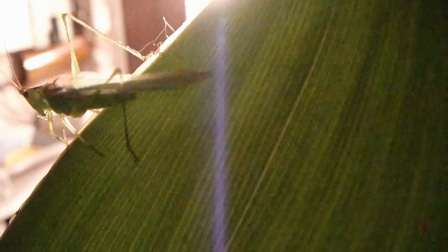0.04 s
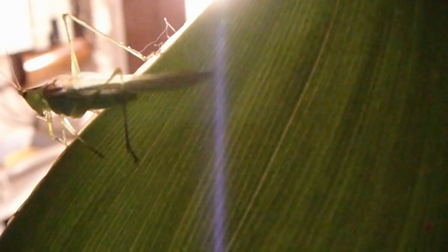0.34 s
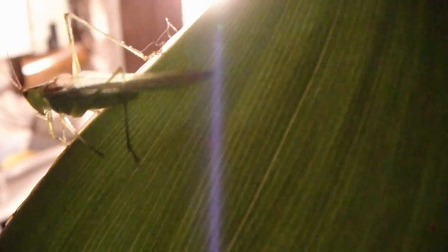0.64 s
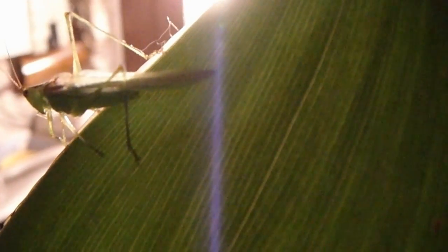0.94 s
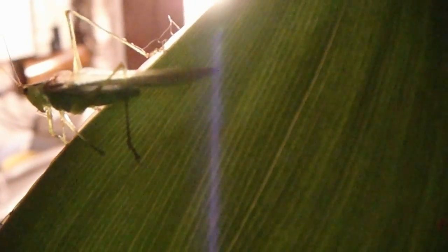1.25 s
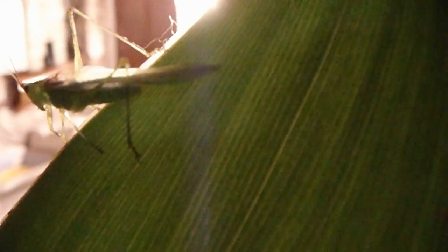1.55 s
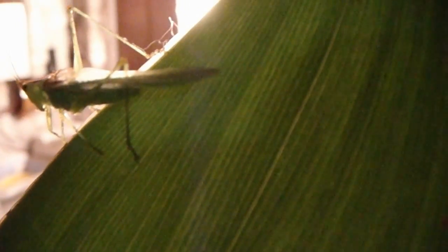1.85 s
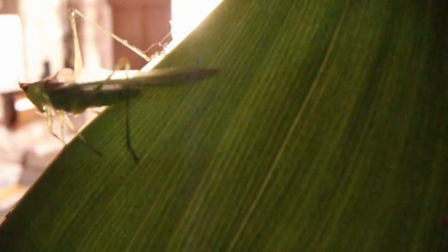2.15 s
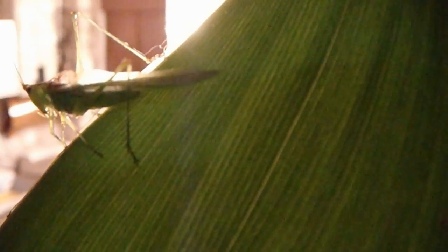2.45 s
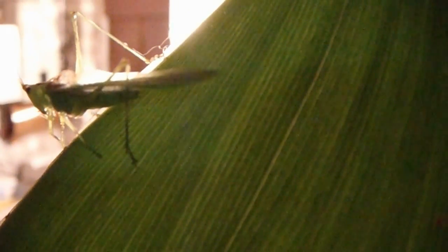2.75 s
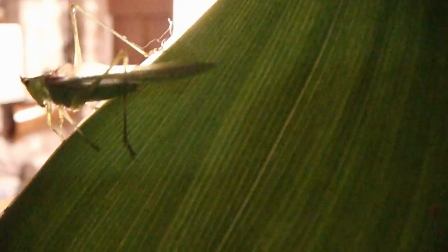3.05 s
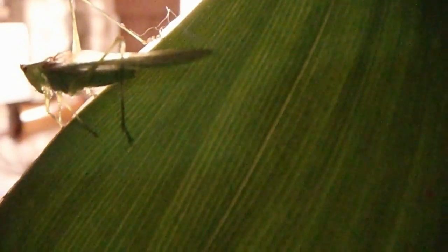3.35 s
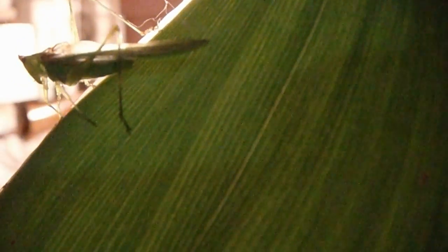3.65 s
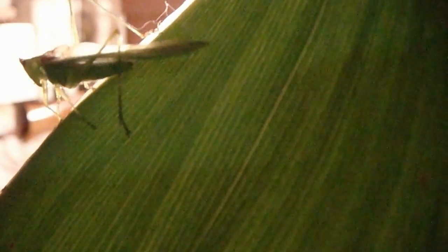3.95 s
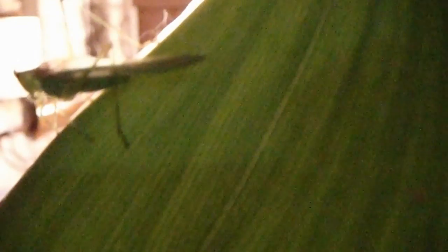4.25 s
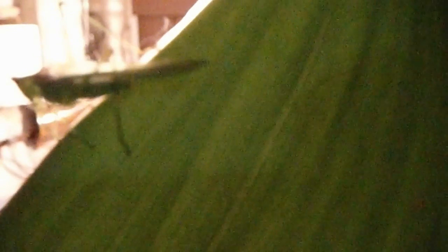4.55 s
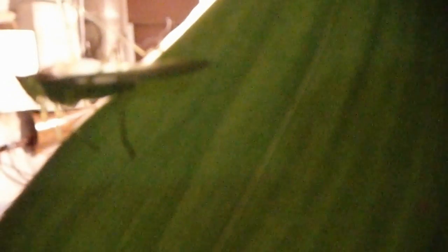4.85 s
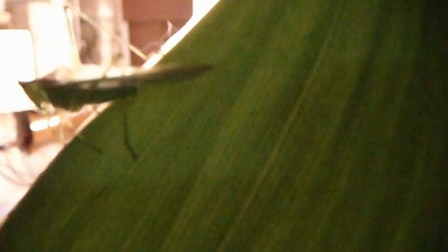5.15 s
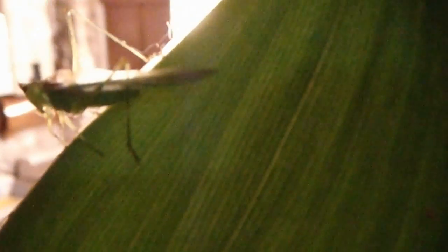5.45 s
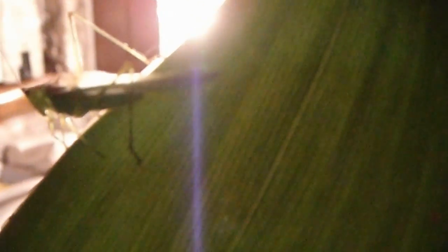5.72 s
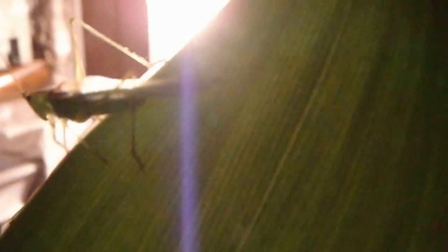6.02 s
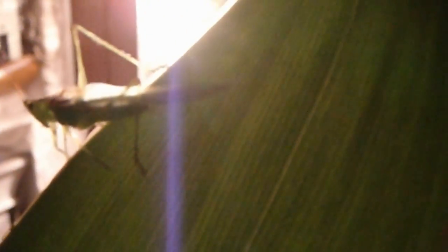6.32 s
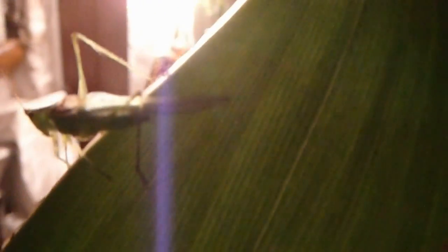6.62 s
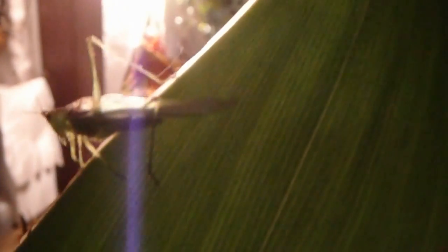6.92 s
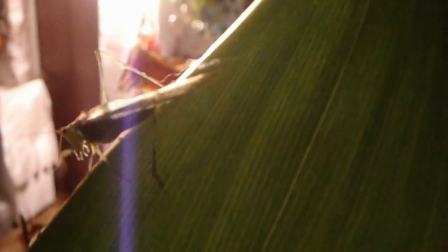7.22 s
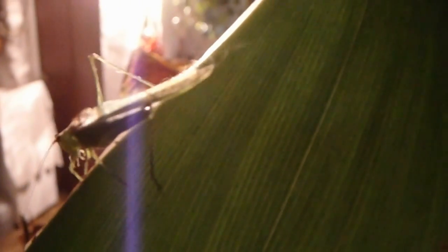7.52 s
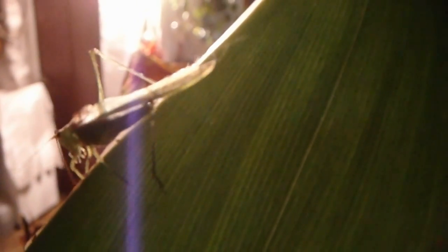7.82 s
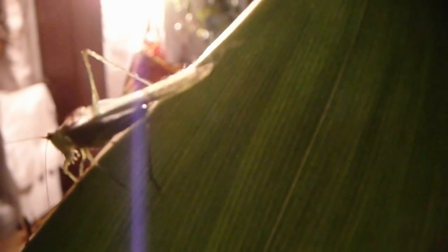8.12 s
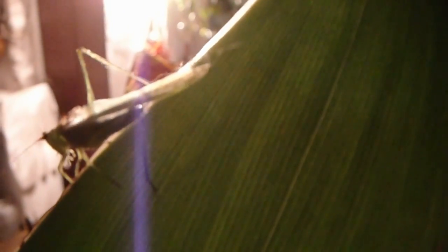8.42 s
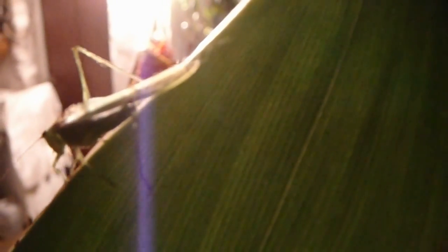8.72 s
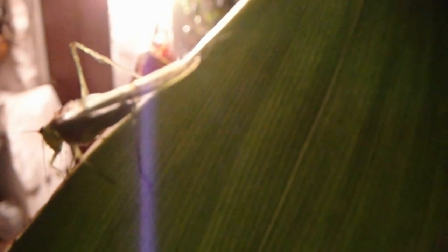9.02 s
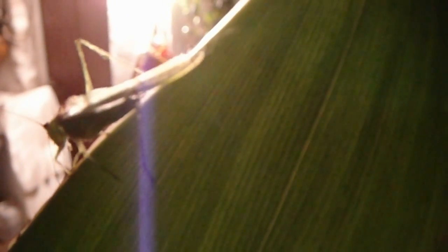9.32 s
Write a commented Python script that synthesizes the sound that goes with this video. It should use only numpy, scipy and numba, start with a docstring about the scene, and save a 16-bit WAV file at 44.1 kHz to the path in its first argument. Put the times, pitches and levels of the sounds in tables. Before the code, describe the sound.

A katydid buzzes close to the microphone outdoors at night: a dry, slightly woody rasp of about forty pulses a second, topped by a thin, very high ring. It is already singing at the start and stops abruptly at 1.7 seconds. It returns from 2.2 to 3.3, briefly around 4, from 4.5 to 7, from 7.5 to 8.4, and in a last blip at 9.4. Restarts come in loud, with tiny snaps and a soft flutter of air, then settle. A low night hush swells in the pauses. A far insect trills very faintly around 3.5 to 4 seconds and again near 8.8. From about 5 to 9 seconds there is faint handling rumble. Around 6.5 the rasp shifts right and spreads, and the buzz turns thinner and more ringing. Toward the end, the soft tyre noise of a distant car draws nearer.

```python
"""Night, a camera close to a katydid on a broad leaf, already in song: forty times a second its wings
open with a thin whistle and close with a rasp of file teeth; the leaf rings and reflects each click.
It pauses abruptly and the gain control lifts the night air, so each new bout starts loud and is pulled
down. A far insect trills around the third bout. From halfway the hand rumbles on the camera and the
katydid turns off axis; toward the end a distant car draws nearer."""
import sys
import numpy as np
from scipy import signal
from scipy.fft import rfft, irfft, next_fast_len
from scipy.io import wavfile
from scipy.ndimage import uniform_filter1d, map_coordinates
from numba import njit

SR = 44100
rng = np.random.default_rng(int(sys.argv[2]) if len(sys.argv) > 2 else 0)


def generate_wav(signal):
    """Clip the signal to [-1, 1] and save it as 16-bit WAV at the path in sys.argv[1]."""
    frames = np.transpose(np.atleast_2d(signal))
    scaled = np.clip(frames, -1, 1) * 32767
    pcm = np.round(scaled).astype(np.int16)
    wavfile.write(sys.argv[1], SR, pcm)


N = 417627
TIME = np.arange(N) / SR


# The insect shifts on its leaf, close to the microphone.
# Each row: time in seconds, rasp level in dB, ring level in dB, turn off axis from 0 to 1.
PERCH = [(0, -48, -43, 0), (3.2, -48, -42.5, 0), (4.85, -51, -43, 0), (5.8, -47, -42, 0.16),
         (6.45, -48.5, -39.5, 1), (6.72, -50.5, -39.5, 1), (7, -55, -38.5, 0.64), (8.4, -53, -39, 1),
         (9.4, -48.5, -40.5, 0.4)]

def katydid(rasp_db=4, ring_db=-2, whistle_db=-10, scuff_db=-20, puff_db=-14.5):
    """The wings rasp, ring, whistle and push air; nearby surfaces scatter the rasp and the ring."""
    phase, openings = wingbeats()
    tooth_db, membrane_db, off_axis = curves(PERCH)
    fresh, surge = bout_starts()
    teeth, membrane = wings_closing(phase)
    whistle, scuff = wings_opening(openings)
    rasp = amp(tooth_db + rasp_db) * (teeth + amp(scuff_db) * scuff)
    rasp = leaf_echo(first_strokes(rasp, fresh, surge) + scraper_catches())
    rasp += amp(-7) * surroundings(rasp)
    # a bout opens with less ring and more whistle
    ring = amp(ring_db - 4 * fresh ** 2) * membrane + amp(whistle_db + 3 * fresh) * whistle
    ring *= amp(membrane_db + 3 * surge)
    ring += amp(-8) * surroundings(ring)
    thump, swirl = wing_draught(phase, openings, fresh, surge, tooth_db + puff_db)
    return microphone_ports(rasp + thump, ring, off_axis, fresh) + swirl


# Bouts of song from the leaf. Each row: start and end in seconds, wingbeats per second, seconds by
# which the middle runs ahead as the wings tire, seconds by which the first half lags and the second
# leads, opening surge from 0 to 1.
SONG_BOUTS = [(-0.029, 1.747, 39.6, 0.0047, 0, 0), (2.189, 3.324, 40.0, 0.004, 0, 1),
              (3.876, 4.108, 40.3, 0, 0, 1), (4.495, 7.049, 40.5, 0.0024, .0009, .55),
              (7.47, 8.427, 40.1, 0.0029, .0019, .3), (9.373, 9.482, 39.4, 0, 0, .2)]

def wingbeats(first_lag_s=0.0087, jitter_s=0.0002):
    """Place within the wingbeat (0-1, 0 at rest) for each sample, and the times the wings reopen."""
    phase, openings = np.zeros(N), []
    for start, end, rate, ahead, lag, _ in SONG_BOUTS:
        length = end - start - first_lag_s
        progress = np.linspace(0, 1, round(length * rate) + 1)
        edges = start + first_lag_s + length * progress - ahead * (1 - (2 * progress - 1) ** 2)
        edges += lag * np.sin(2 * np.pi * progress) + jitter_s * rng.standard_normal(len(edges))
        phase += np.interp(TIME, edges, np.arange(len(edges))) % 1
        openings.extend(edges[1:-1])
    return phase, np.array(openings)


def bout_starts(settle_s=0.099):
    """Freshness is 1 as a bout starts and dies as the wings settle; effort surges on the way."""
    fresh, surge = np.zeros((2, N))
    for start, *_, effort in SONG_BOUTS:
        if start > 0:
            settling = (TIME >= start) * np.exp(-np.abs(TIME - start) / settle_s)
            fresh += settling
            surge += effort * np.sin(np.pi * settling)
    return fresh, surge


# The scraper pressing on the file. Each row: share of the wingbeat from 0 to 1, pressure in dB.
SCRAPER_PRESSURE = [(0, -42), (.13, -12), (.24, -11), (.4, -7), (.53, -1.5), (.6, 0.5), (.82, 0.5),
                    (.93, -20), (1, -31)]
# One tooth's dry click, heard close. Each row: frequency in Hz, spectral level in dB.
TOOTH_SPECTRUM = [(100, -17.5), (290, -12.5), (440, -4), (900, -2.5), (1400, -2), (2000, -3), (3000, -1),
                  (3800, -0.63), (5500, 1), (7200, 3.5), (9000, 3.5), (11500, -17)]
# The ringing wing membrane, heard close. Each row: frequency in Hz, spectral level in dB.
MEMBRANE_SPECTRUM = [(1000, -55.5), (4000, -13.5), (6000, -9), (7500, -3.5), (8700, 1.5), (9700, 4.5),
                     (10400, 4), (10900, 7.5), (11500, -11.5)]

def wings_closing(phase, friction_db=-19, scrape_db=-5, flex_hz=5000, body_hz=2600, ring_follow=0.78):
    """The scraper jumps from tooth to tooth: dry clicks and friction keep the membrane ringing."""
    singing = phase > 0
    pressure_db = np.interp(phase, *np.transpose(SCRAPER_PRESSURE))
    pressure_db += 0.68 * wobble(40) + 0.5 * wobble(250)
    # the wing flexes under each click: a push, then a pull
    teeth = unit(filtered(file_teeth(phase), lambda hz: (1j * hz - flex_hz) / (1j * hz + flex_hz)))
    rasp = levelled(teeth + amp(friction_db) * rng.standard_normal(N), singing * amp(pressure_db))
    # light contact sounds thin: only firm pressure brings out the body
    rasp -= (1 - amp(np.minimum(pressure_db, 0))) * lowpassed(rasp, body_hz)
    # the membrane also answers light contact, and rings most at the end of the file
    last_teeth_db = 3.5 * np.exp(-0.5 * ((phase - 0.96) / 0.073) ** 2)
    ring_level = singing * amp(ring_follow * pressure_db + last_teeth_db)
    drive = levelled(teeth + amp(scrape_db) * rng.standard_normal(N), ring_level)
    return unit(woody_ring(struck(rasp, TOOTH_SPECTRUM))), unit(struck(drive, MEMBRANE_SPECTRUM))


def file_teeth(phase, count=27, drift_per_s=1.8, wear_db=1.1, spread_db=1.7):
    """One click a tooth: every stroke meets the same uneven file as the scraper's track drifts."""
    tooth = (phase * count).astype(int)
    at = np.flatnonzero(np.diff(tooth) > 0) + 1
    place, drift = tooth[at], at / SR * drift_per_s

    def track(along_file):
        surface = rng.standard_normal((count + 4, int(drift[-1]) + 4))
        return map_coordinates(surface, [along_file, drift])

    late, level = rng.standard_normal((2, len(at)))
    shift = 0.27 * track(place) + 0.5505 * track(place / 10) + 0.08 * late  # in tooth spacings
    at = np.clip(at + shift * np.median(np.diff(at)), 0, N - 1)
    return clicks(at, amp(wear_db * track(place) + spread_db * level))


# Resonances of the wing covers and the leaf under them.
# Each row: frequency in Hz, width in Hz, relative level in dB.
WOODY_MODES = [(459, 56, -6), (636, 78, -4), (1057, 69, -7.5), (1170, 70, -12), (1650, 220, -6),
               (2226, 100, -8), (2870, 90, -9.5), (3097, 110, -8.5), (3480, 74, -10.5), (4270, 330, -11.5),
               (4980, 130, -12), (6050, 130, -14)]

def woody_ring(x, wood_db=1):
    """The wing covers and the leaf ring at fixed pitches, giving each stroke a woody tone."""
    def modes(hz):
        return sum(amp(db) * 1j * hz * width / (centre ** 2 - hz ** 2 + 1j * hz * width)
                   for centre, width, db in WOODY_MODES)
    return x + amp(wood_db) * filtered(x, modes)


# A bout's first opening comes early, as the wings leave their rest.
# Each row: time in seconds, level in dB against the later openings.
EARLY_OPENINGS = [(2.191, 1), (3.8764, -1), (4.497, -2.5), (7.4757, -5.5), (9.3732, -12)]

def wings_opening(openings, whistle_hz=10750, spread_hz=280, width_s=0.00076, hiss_db=-4, size=512):
    """The opening wings brush twice, each time a short membrane whistle and a faint dry scuff."""
    offsets = np.arange(size) - size // 2
    t = offsets / SR
    at, db = np.transpose(EARLY_OPENINGS + [(s, 0) for s in openings])
    brushes_s = (at[:, None] + [0.0023, 0.0044]).ravel()
    late, pitch, level, turn = rng.standard_normal((len(brushes_s), 4)).T[:, :, None]
    swell = amp(np.repeat(db, 2)[:, None] + 2.5 * level) * np.exp(-0.5 * (t / width_s) ** 2)
    tone = np.sin(2 * np.pi * ((whistle_hz + spread_hz * pitch) * t + turn))
    centres = np.round((brushes_s[:, None] + 0.00015 * late) * SR).astype(int)
    index = np.clip(centres + offsets, -1, N) + 1
    place = lambda grains: np.bincount(index.ravel(), grains.ravel(), N + 2)[1:N + 1]
    hiss = struck(place(swell) * rng.standard_normal(N), MEMBRANE_SPECTRUM)
    scuff = struck(place(swell) * rng.standard_normal(N), TOOTH_SPECTRUM)
    whistle = unit(place(swell * tone)) + amp(hiss_db) * unit(hiss)
    return unit(whistle), unit(scuff)


def first_strokes(rasp, fresh, surge, split_hz=1800, first_db=-9.5, surge_db=2, body_db=-15):
    """A bout starts light and thin, then surges; the rasp fills out as the wings settle."""
    body = lowpassed(rasp, split_hz)
    thinned = rasp - body + amp(body_db * fresh) * body
    return amp(first_db * fresh ** 2 + surge_db * surge) * thinned


# Close snaps early in a bout. Each row: start in seconds, length in seconds, level in dB.
CATCHES = [(2.187, .005, -48), (2.239, .005, -23.5), (2.2615, .005, -26), (3.879, .005, -34.5),
           (3.904, .003, -25.5), (3.93, .004, -24), (4.493, .006, -47), (4.547, .004, -23.5),
           (7.4903, .005, -26), (9.3763, .004, -27), (9.408, .003, -28)]

def scraper_catches(gap_s=0.0011, spread_db=2, ring_db=-8):
    """The scraper catches on a few teeth: a short run of hard clicks."""
    runs = [(s, db) for start, length, db in CATCHES for s in np.arange(start, start + length, gap_s)]
    at, db = np.transpose(runs)
    late, level = rng.standard_normal((len(at), 2)).T
    teeth = clicks((at + 0.12 * gap_s * late) * SR, amp(db + spread_db * level))
    return struck(teeth, TOOTH_SPECTRUM) + amp(ring_db) * struck(teeth, MEMBRANE_SPECTRUM)


# A wingbeat's puff of air at the microphone. Each row: frequency in Hz, spectral level in dB.
PUFF_SPECTRUM = [(15, 0.5), (40, 0.5), (80, -1), (125, -5.5), (170, -8), (260, -13.5), (500, -36),
                 (1500, -82.5)]

def wing_draught(phase, openings, fresh, surge, level_db, closing_s=0.0163, swirl_db=-5):
    """Each closing pushes a puff of air: weak at the first stroke, a soft thumping in the surge."""
    swing_db = -4 * fresh ** 2 + 11 * surge * np.sqrt(fresh)
    push = amp(level_db + swing_db + 0.37 * wobble(3.7))
    late, level = rng.standard_normal((len(openings), 2)).T
    at = np.clip((openings + closing_s + 0.0005 * late) * SR, 0, N - 1)
    puffs = unit(struck(clicks(at, amp(2 * level)), PUFF_SPECTRUM, size=8192))
    swirl = amp(swirl_db) * (phase > 0) * stereo_noise(PUFF_SPECTRUM)
    return push * puffs, push * swirl


# The leaf just behind the insect. Each row: time in seconds, echo delay in milliseconds.
LEAF_DELAY = [(3.3, 1.6), (4.6, 1.8), (7, 1.65), (7.6, 1.89), (9.4, 1.53)]

def leaf_echo(x, echo_db=-14, dull_hz=5500):
    """The leaf returns one close, dull echo, which combs the rasp."""
    delay = curves(LEAF_DELAY)[0] * SR / 1000
    dull = filtered(x, lambda hz: 1 / np.sqrt(1 + (hz / dull_hz) ** 2))
    return x + amp(echo_db) * map_coordinates(dull, [np.arange(N) - delay])


def surroundings(x, near_t60_s=0.0067, far_t60_s=0.066, far_db=-10, size=4096, count=10, block=512):
    """Nearby surfaces scatter the sound into a short tail whose pattern shifts as the wings move."""
    t = np.arange(size) / SR
    decay = amp(-60 * t / near_t60_s) + amp(far_db) * amp(-60 * t / far_t60_s)
    tails = rng.standard_normal((count, size)) * decay / np.linalg.norm(decay)
    pattern = rng.integers(count, size=N // block + 1)[np.arange(N) // block]
    return sum(signal.oaconvolve(x * (pattern == k), tails[k])[:N] for k in range(count))


# The rasp, then the ring, across the microphone's two ports.
# Each row: frequency in Hz, weight in the side signal in dB.
RASP_WIDTH = [(40, -5), (200, -3), (1500, -1), (4000, -7), (7000, -18.5), (11000, -5.5)]
RING_WIDTH = [(7000, -35), (8500, -22), (9600, 1.5), (11000, 1.5)]
# The ring sits left of centre until the insect turns. Each row: time in seconds, lean from 0 to 1.
RING_LEAN = [(5.8, 0.28), (7.1, 0.11)]

def microphone_ports(rasp, ring, off_axis, fresh):
    """Off axis the rasp moves right and scatters; the ring and the wide first strokes lean left."""
    lean, = curves(RING_LEAN)
    unsettled = np.sqrt(fresh)
    body = filtered(rasp, lambda hz: amp(along(RASP_WIDTH, hz)))
    treble = filtered(ring, lambda hz: amp(along(RING_WIDTH, hz)))
    direct = lean * treble + 0.13 * unsettled * rasp - off_axis * body
    spread = amp(-20) + amp(-3) * off_axis + amp(-1) * unsettled
    stray = amp(-9.5) * treble + spread * body + amp(-5) * unsettled * (rasp - body)
    side = direct + surroundings(stray, near_t60_s=0.0045, far_db=-15)
    return rasp + ring + np.array([side, -side])


# Tyres on a far road. Each row: frequency in Hz, spectral level in dB.
TYRE_SPECTRUM = [(25, -4), (60, -15), (130, -5), (250, -5.5), (700, -2), (1200, -10), (2500, -17),
                 (5500, -26), (11000, -30)]

def distant_car(pass_s=10.17, closest_m=22.8, speed_m_per_s=10.2, pass_db=-61, split_hz=350):
    """Tyre noise grows louder and brighter as the car nears."""
    road_m = speed_m_per_s * (TIME - pass_s)
    nearness = closest_m / np.hypot(closest_m, road_m)
    tyres = stereo_noise(TYRE_SPECTRUM, side_db=-5.5)
    rumble = lowpassed(tyres, split_hz)
    return amp(pass_db) * (nearness * rumble + nearness ** 1.81 * (tyres - rumble))


# Handling noise on the camera body. Each row: frequency in Hz, spectral level in dB.
HAND_SPECTRUM = [(25, -4), (80, 0), (160, -3), (400, -16), (1000, -26.5), (4000, -68.5)]
# Its rise and fall at the microphone. Each row: time in seconds, level in dB.
HAND_MOVES = [(4.5, -87), (5.5, -64), (6.5, -67), (7, -62.5), (7.15, -65), (7.45, -64), (7.65, -59),
              (8.3, -59.5), (8.7, -64.5), (9.4, -80.5)]

def handling(waver_db=1.5):
    """The hand rumbles faintly on the camera as it swings off the insect's axis."""
    hand_db, = curves(HAND_MOVES)
    return amp(hand_db + waver_db * wobble(5)) * stereo_noise(HAND_SPECTRUM, side_db=-2)


# Trills from far out in the dark. Each row: start in seconds, length in seconds, level in dB.
FAR_TRILLS = [(3.42, 0.26, -87), (3.78, .2, -81), (8.794, .21, -80)]

def far_insect(pitch_hz=3870, width_hz=70, chorus_width_hz=220, fade_s=0.04, chorus_db=-90.5):
    """Short thin trills of a far insect, over a fainter and broader chorus of its kind."""
    def band(width):
        skirt = [(-5, -60), (-1, -4), (0, 0), (1, -4), (5, -60)]  # widths from the pitch, dB
        return stereo_noise([(pitch_hz + step * width, db) for step, db in skirt])

    trills = sum(amp(db) * np.clip(np.minimum(TIME - start, start + length - TIME) / fade_s, 0, 1)
                 for start, length, db in FAR_TRILLS)
    return trills * band(width_hz) + amp(chorus_db) * band(chorus_width_hz)


# Still night air all around the microphone. Each row: frequency in Hz, spectral level in dB.
NIGHT_SPECTRUM = [(25, -10), (50, -10.5), (75, 0), (130, -5.5), (220, -8), (400, -16.5), (1100, -20),
                  (2000, -27.5), (3400, -30.5), (5000, -33), (11000, -35.5)]

def night_air(level_db=-67):
    """A low, steady hush."""
    return amp(level_db) * stereo_noise(NIGHT_SPECTRUM)


# Diffuse sound across the two ports. Each row: frequency in Hz, side minus mid in dB.
AMBIENT_WIDTH = [(50, -7.5), (700, -5), (3000, -2), (7000, 0)]

def stereo_noise(spectrum, side_db=0):
    """Noise of rms 1, alike on both sides in the bass and wider in the treble."""
    mid, side = filtered(rng.standard_normal((2, N)), lambda hz: amp(along(spectrum, hz)))
    side = filtered(side, lambda hz: amp(side_db + along(AMBIENT_WIDTH, hz)))
    return unit(np.array([mid + side, mid - side]))


def amp(db):
    """Decibels to gain."""
    return 10 ** (np.asarray(db) / 20)


def unit(x):
    """x scaled to rms 1."""
    return x / np.sqrt(np.mean(x ** 2) + 1e-20)


def along(points, hz):
    """(Hz, value) points read on a log axis."""
    knots_hz, values = np.transpose(points)
    return np.interp(np.log(hz + 1), np.log(knots_hz + 1), values)


def curves(rows):
    """One value per sample for each column after the time."""
    seconds, *columns = np.transpose(rows)
    return [np.interp(TIME, seconds, column) for column in columns]


def wobble(rate):
    """A smooth random curve, rate knots a second."""
    return map_coordinates(rng.standard_normal(int(N * rate / SR) + 4), [TIME * rate])


def filtered(x, response):
    """x through a response given as a function of frequency."""
    size = next_fast_len(N + SR // 2)
    return irfft(rfft(x, size) * response(np.fft.rfftfreq(size, 1 / SR)), size)[..., :N]


def lowpassed(x, split_hz):
    """The part of x below split_hz."""
    return filtered(x, lambda hz: 1 / (1 + (hz / split_hz) ** 4))


def struck(x, spectrum, size=2048):
    """x through a causal body with the given spectrum."""
    cepstrum = irfft(np.log(amp(along(spectrum, np.fft.rfftfreq(size, 1 / SR)))))
    cepstrum[1:size // 2] *= 2
    cepstrum[size // 2 + 1:] = 0
    return signal.oaconvolve(x, irfft(np.exp(rfft(cepstrum))))[:N]


def clicks(at, sizes, reach=8):
    """Impulses at fractional sample positions."""
    index = at.astype(int)[:, None] + np.arange(1 - reach, reach + 1)
    offset = index - at[:, None]
    shape = np.sinc(offset) * np.cos(np.pi * offset / (2 * reach)) ** 2
    return np.bincount(np.clip(index, 0, N).ravel(), (shape * sizes[:, None]).ravel(), N + 1)[:N]


def levelled(grain, envelope, size=320, frames=48):
    """The grain under the envelope, held even in colour and strength over a few strokes."""
    spectra, white = (signal.stft(envelope * x, nperseg=size)[2] for x in (grain, rng.standard_normal(N)))
    power = lambda z: np.abs(uniform_filter1d(np.abs(z) ** 2, frames, axis=1)) + 1e-12
    gain = np.sqrt(power(white).mean(axis=0) / power(spectra))
    return signal.istft(spectra * gain, nperseg=size)[1][:N]


def scene():
    """The katydid up close; behind it the car and the night air waver together by about a decibel."""
    song = katydid()
    background = (distant_car() + night_air()) * amp(wobble(7.4))
    return song + background + far_insect() + handling()


@njit
def gain_control(wanted, attack, release):
    """Gain in dB: it sinks by a share of the excess each sample and climbs back at a steady pace."""
    gain = np.zeros(len(wanted))
    for i in range(1, len(wanted)):
        gap = wanted[i] - gain[i - 1]
        gain[i] = gain[i - 1] + (gap * attack if gap < 0 else min(gap, release))
    return gain


def record(dry, target_db=-42.5, most_db=17, attack_s=0.13, release_db_per_s=27, top_hz=11100):
    """The camera lifts quiet sound and backs off under loud sound; its band ends steeply."""
    power = np.abs(uniform_filter1d(np.mean(dry ** 2, axis=0), size=SR // 40))
    wanted_db = np.clip(target_db - 10 * np.log10(power + 1e-14), 0, most_db)
    gain_db = gain_control(wanted_db, 1 / (attack_s * SR), release_db_per_s / SR)
    return filtered(dry * amp(gain_db), lambda hz: 1 / np.sqrt(1 + (hz / top_hz) ** 240))


dry = scene()
out = record(dry)
generate_wav(out)
```